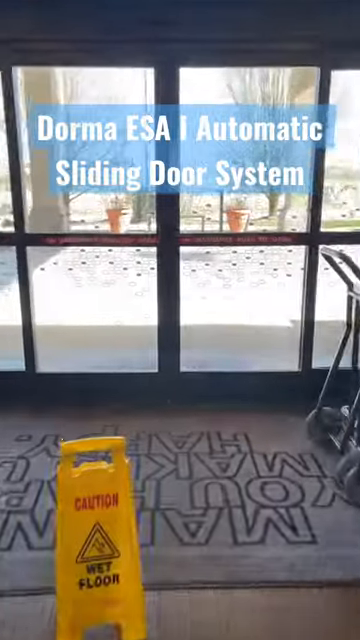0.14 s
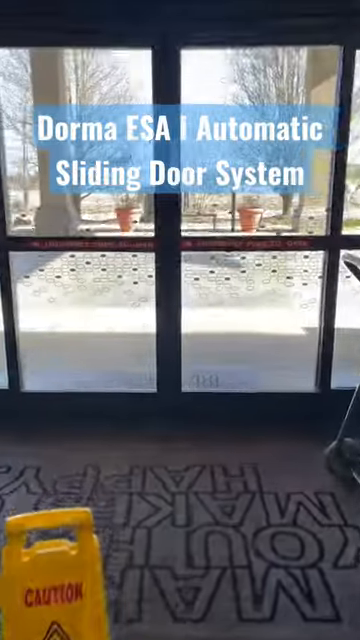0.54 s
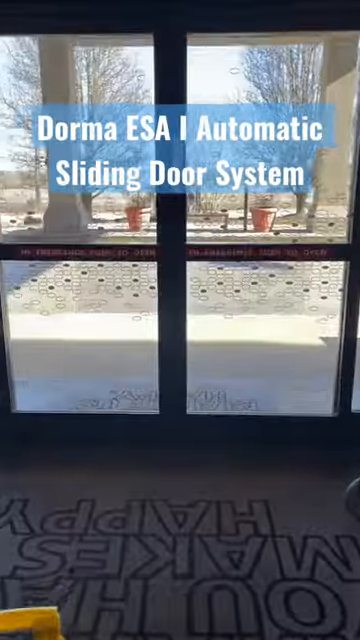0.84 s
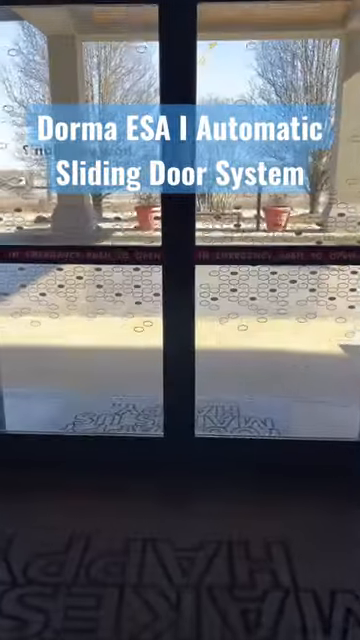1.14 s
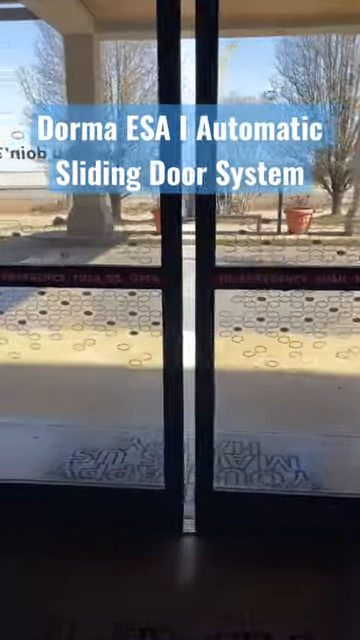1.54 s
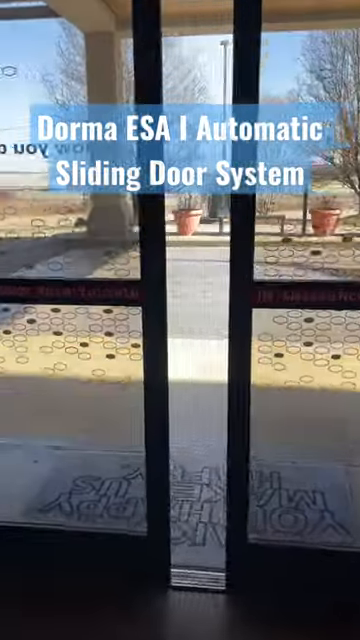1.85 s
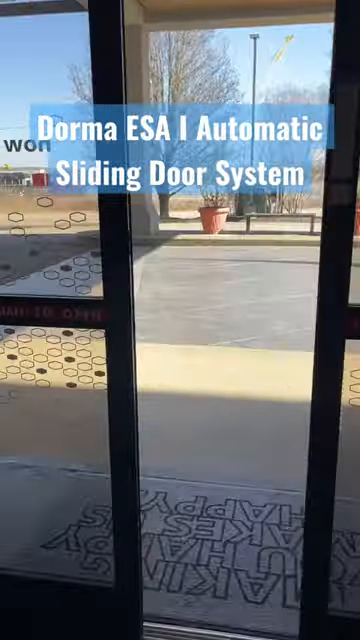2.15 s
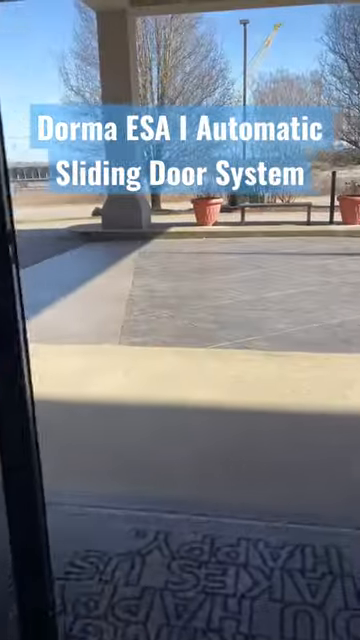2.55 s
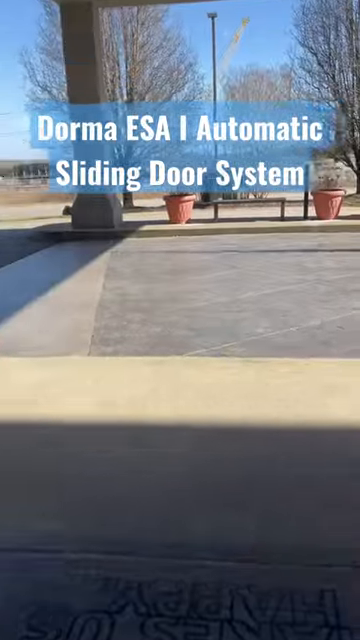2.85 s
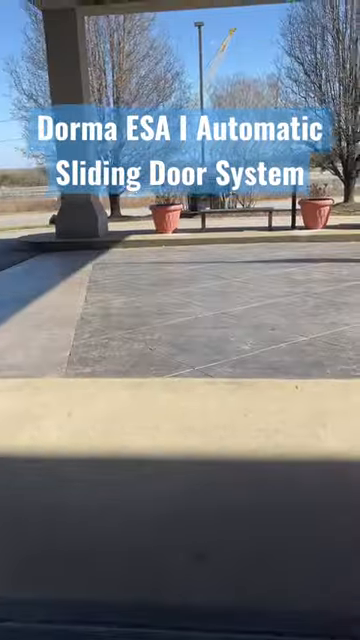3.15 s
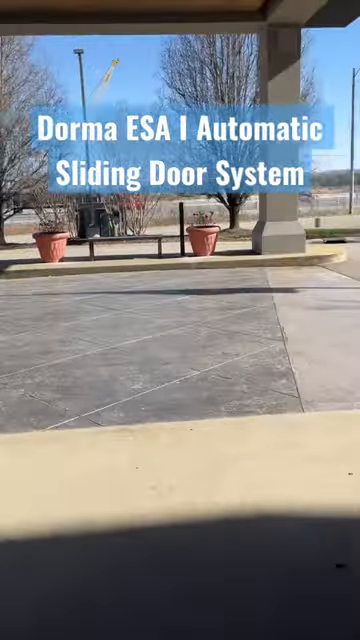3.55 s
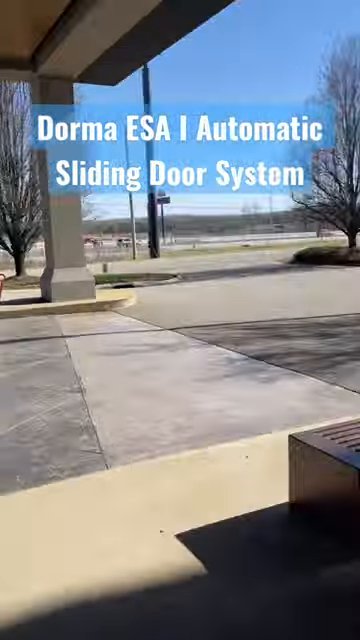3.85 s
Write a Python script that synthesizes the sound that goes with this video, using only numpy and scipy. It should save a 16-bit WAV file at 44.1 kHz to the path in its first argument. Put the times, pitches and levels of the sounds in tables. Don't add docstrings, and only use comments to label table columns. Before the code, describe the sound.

Automatic glass sliding doors part with soft brush hiss as low street roar swells in

```python
import sys
import numpy as np
from scipy import signal
from scipy.fft import rfft, irfft, next_fast_len
from scipy.io import wavfile
from scipy.ndimage import uniform_filter1d

SR = 44100
rng = np.random.default_rng(int(sys.argv[2]) if len(sys.argv) > 2 else 0)


def how_loud(loudness_db):
    steps = np.asarray(loudness_db, float) / 20
    return 10 ** steps


def store_pcm(level_fs):
    pcm = np.round(np.clip(level_fs, -1, 1) * 32767).astype(np.int16)
    wavfile.write(sys.argv[1], SR, np.atleast_2d(pcm).T)


N = 176400
BIG_KEY_HZ = 11058


def evened(x):
    return x / np.sqrt(np.mean(x ** 2) + 1e-20)


def read(points, hz):
    f, value = np.transpose(points)
    return np.interp(np.log(hz + 1), np.log(f + 1), value)


def drift(rate, size=N):
    t = np.arange(0, size + 64, 64) / SR
    slow = 0
    for f in np.geomspace(rate / 20, rate, 20):
        slow = slow + np.sin(2 * np.pi * (f * t + rng.random())) / np.sqrt(f)
    return np.interp(np.arange(size) / SR, t, evened(slow))


def resonate(x, hz, width):
    turn = np.exp(2j * np.pi * hz * np.arange(x.shape[-1]) / SR)
    r = np.exp(-np.pi * width / SR)
    return 2 * (turn * signal.lfilter([1 - r], [1, -r], x / turn)).real


def narrowband(noise, hz, width, second_width=None):
    once = resonate(noise, hz, width)
    return evened(resonate(once, hz, second_width or width))


def wash(spectrum, patchy_db):
    frames, hz = N // 512 + 6, np.fft.rfftfreq(2048, 1 / SR)
    a, b, c, d, patches = rng.standard_normal((frames, 1025, 5)).T
    patches = uniform_filter1d(patches, size=20, axis=0)
    patches = evened(uniform_filter1d(patches, size=8, axis=1))
    inside = (hz > spectrum[0][0] / 2)[:, None]
    gain = how_loud(read(spectrum, hz)[:, None] + patchy_db * patches) * inside
    z = np.array([a + 1j * b, c + 1j * d]) * gain
    return evened(signal.istft(z, nperseg=2048, noverlap=1536)[1][:, :N])


def add(mix, s, sound):
    part = mix[:, round(s * SR):][:, :sound.shape[1]]
    part += sound[:, :part.shape[1]]


# (start [s], end [s])
WHISTLE_ON = [(.27, .41), (.55, 1.06), (1.08, 1.56), (1.58, 1.66), (1.72, 1.79), (2.04, 2.22), (2.29, 2.33),
              (2.59, 2.68), (2.97, 3.1), (3.31, 3.35), (3.4, 3.65), (3.72, 3.9)]


def whistle():
    hz, level_db = 15695, -88
    t = np.arange(N) / SR
    on = sum(np.clip(np.minimum(t - a, b - t) / .015, 0, 1) for a, b in WHISTLE_ON)
    return how_loud(level_db) * on * narrowband(rng.standard_normal(N), hz, 60)


# (frequency [Hz], level per Hz [dB])
LOBBY = [(15, -33), (25, 8), (76, -9), (149, -11.5), (236, -16), (619, -32), (828, -24.5), (1880, -32),
         (2050, -39.5), (8000, -72), (10400, -95), (17600, -120)]


def lobby():
    return how_loud(-44 + .3 * drift(6.8)) * wash(LOBBY, patchy_db=2.0)


# (frequency [Hz], level per Hz [dB])
AIR = [(3000, -1.5), (6500, -4), (8200, -2.5), (9300, -4), (10600, -0.5), (11400, -8), (12000, -17),
       (13000, -48)]
# (time [s], level [dB])
HISS = [(0, -18), (.8, -6.5), (1.35, -3.5), (1.85, -1.5), (2.3, 2.5), (2.7, 2), (3.2, -1.5), (3.64, -2.5),
        (4, -8)]


def air():
    hiss_db = np.interp(np.arange(N) / SR, *np.transpose(HISS))
    return how_loud(-61.5 + hiss_db + 0.28 * drift(5.34)) * wash(AIR, patchy_db=-2.5)


# (frequency [Hz], level per Hz [dB])
SLEEVE = [(1500, -6), (4000, -6.5), (6500, -8.5), (8500, 2), (9600, 3.5), (11200, 3.5), (12600, -2),
          (13300, -38)]


def sleeve():
    hold_s, fade_db_per_s = 0.14, 44.5
    fade_db = fade_db_per_s * np.maximum(np.arange(N) / SR - hold_s, 0)
    return how_loud(-47 - fade_db + .8 * drift(40)) * wash(SLEEVE, patchy_db=1.5)


def roller_whine():
    start_s, end_s, hz, level_db = 1.25, 1.47, 4480, -76
    t = np.arange(N) / SR
    rolling = np.clip(np.minimum(t - start_s, end_s - t) / 0.01, 0, 1)
    return how_loud(level_db) * rolling * evened(resonate(rng.standard_normal((2, N)), hz, 90))


# (time [s], street [dB], engine first order [dB], engine second order [dB], porch boom [dB])
OUTSIDE = [(0, -18, -38.5, -40, -17.5), (.25, -15, -37.5, -47, -9.5), (.5, -20, -35, -45.5, -17),
           (.85, -21, -36, -44.5, -12.5), (1.27, -17, -42, -53.5, -17.5), (1.43, -14, -42.5, -35.5, -14.5),
           (1.62, -9.5, -37, -39, -10), (1.9, -7, -55, -35.5, -4.5), (2.3, -3.5, -54, -34.5, -4.5),
           (2.65, -2.5, -43, -30, -5.5), (2.82, -3, -35, -39, -1), (3.0, -3.5, -34, -27.5, -1),
           (3.2, -1, -31, -36, -2.5), (3.349, -3, -33, -26.5, -4.5), (3.5, -3, -28, -32.5, -2),
           (3.65, -0.5, -20.5, -28.5, 5.5), (3.87, 1, -29.5, -42, 2.5), (4, 2, -30.5, -28.5, -10.5)]


def outside(column):
    rows = np.array(OUTSIDE)
    return np.interp(np.arange(N) / SR, rows[:, 0], rows[:, column])


# (frequency [Hz], level per Hz [dB])
STREET = [(15, -46), (25, -10), (69, -2), (181, -3.5), (230, -4.5), (523, -14.5), (1130, -23), (1880, -31),
          (2050, -31.5), (3400, -42.5), (8000, -66.5), (10400, -96), (17600, -120)]


def street():
    return how_loud(-25.5 + outside(column=1) + .7 * drift(6)) * wash(STREET, patchy_db=1.8)


# (frequency [Hz], width [Hz], level [dB])
BOOMS = [(114.6, 18, -35.5), (179.5, 27.6, -40.5), (208.1, 14, -37), (237.3, 21, -36.5),
         (330.7, 13.2, -44.5), (777, 174, -42.5), (1750, 180, -54)]


def porch():
    low_db, high_db = outside(column=4), outside(column=1)
    total = 0
    for hz, width, db in BOOMS:
        opening_db = low_db if hz < 300 else high_db
        boom = narrowband(rng.standard_normal((2, N)), hz, width * 1.48)
        total = total + how_loud(db + opening_db + drift(4.5)) * boom
    return total


def engine():
    idle_hz, waver_hz, fuzz_width_hz, fuzz_share = 65.76, 0.791, 8.9, 0.51
    turns = np.cumsum(idle_hz + waver_hz * drift(2.99)) / SR
    out = 0
    for order in (1, 2):
        fuzz = narrowband(rng.standard_normal(N), order * idle_hz, fuzz_width_hz * order)
        line = np.sin(2 * np.pi * order * turns)
        out = out + how_loud(outside(column=order + 1)) * evened(line + fuzz_share * fuzz)
    return np.array([out, 0 * out])


def car():
    closest_s, half_width_s, tyre_hz, level_db = 3.42, 0.18, 800, -35
    near = 1 / (1 + ((np.arange(N) / SR - closest_s) / half_width_s) ** 2)
    return how_loud(level_db) * near * narrowband(rng.standard_normal((2, N)), tyre_hz, 490, 400)


# (time [s], level [dB], frequency [Hz])
THUDS = [(.0, -43, 486), (.116, -36.5, 754), (.13, -40, 520), (0.172, -38, 297), (0.302, -38, 200),
         (0.371, -35.5, 233), (0.679, -35.5, 198), (1.03, -51, 1300), (1.2, -44, 410), (1.66, -38.5, 680),
         (1.76, -38, 480), (2.227, -30, 547), (3.692, -39, 700)]


def thud(s, db, hz):
    t, t60 = np.arange(SR // 4) / SR, .14
    body = narrowband(rng.standard_normal((2, len(t))), hz, hz * .35)
    return s, np.minimum(t / .01, 1) * how_loud(db - 60 * t / t60) * body


# (time [s], level [dB], centre [Hz], T60 [s], rise [s])
SCUFFS = [(0.184, -50.5, 1980, 0.14, .006), (0.294, -51.5, 2170, 0.2, 0.0032), (0.296, -61, 5200, .1, .003),
          (0.351, -52, 2080, .08, .003), (.352, -64, 4600, .05, .002), (.402, -63, 4400, .08, .004),
          (0.894, -49, 9000, 0.25, .003), (0.894, -54, 7900, .1, .003), (0.893, -58, 5050, 0.26, 0.0027),
          (.896, -61, 6800, .2, .004), (.896, -60, 11700, 0.12, .003), (.897, -55, 2000, 0.19, 0.0045),
          (.96, -64.5, 4800, .3, 0.032), (1.02, -53, 2130, 0.26, 0.015), (1.045, -62, 3660, 0.24, .006),
          (1.118, -54, 8000, 0.011, 0.00086), (1.118, -57, 5450, .012, .001),
          (1.129, -57, 8100, .015, 0.00092), (1.194, -61, 8800, 0.054, .003), (1.195, -64, 5040, .08, .004),
          (1.207, -55, 7600, 0.18, 0.0022), (1.213, -59.5, 3600, 0.31, .006),
          (1.211, -61, 6000, .15, 0.0037), (2.17, -61, 3500, 0.14, .004), (2.421, -61, 5550, .15, .004),
          (2.658, -53, 3020, 0.091, .004), (2.69, -49, 3840, 0.14, .004), (2.7, -49, 2570, 0.56, 0.018),
          (2.77, -55, 4600, .06, .003), (2.841, -52, 3740, 0.16, .004), (2.933, -56, 4500, 0.018, .001),
          (2.94, -60, 2580, .5, 0.018), (3.075, -65, 5900, .12, .004), (3.571, -50.5, 3000, 0.12, 0.0068),
          (3.575, -73, 8600, .1, .005), (3.849, -57.5, 3500, 0.21, 0.011), (3.956, -52, 2800, 0.16, 0.0072),
          (3.96, -67, 8200, .1, .006)]


def scuff(s, db, hz, t60, rise):
    spread, wide_db = .08, -7
    t = np.arange(SR // 4) / SR
    noise = rng.standard_normal((2, len(t)))
    band = narrowband(noise, hz, 400 + hz * spread, 1200 + hz * spread * 2)
    wide = evened(signal.lfilter(*signal.butter(3, [1500, 9800], "bandpass", fs=SR), noise))
    envelope = np.minimum(t / rise, 1) * how_loud(db - 60 * np.maximum(t - rise, 0) / t60)
    return s, envelope * (band + how_loud(wide_db) * wide)


def singing():
    start_s, end_s, level_db = 2.851, 2.906, -48
    t = np.arange(SR // 5) / SR
    after = t - end_s + start_s
    fall_db = -14 * np.clip(after / .004, 0, 1) - 250 * np.maximum(after, 0)
    level = how_loud(level_db + fall_db + 1.5 * drift(80, size=len(t)))
    tone = np.minimum(t / .006, 1) * level * np.sin(2 * np.pi * BIG_KEY_HZ * t)
    return start_s, np.array([tone, tone])


# (frequency [Hz], level [dB], T60 [s])
KEYS = [(4200, -10, .035), (5165, -11, .05), (6400, -12, .04), (7040, -11, .05), (7600, -9, .04),
        (8300, -9, .06), (8760, -10, .04), (9100, -9, .05), (10800, -9, .04), (11500, -10, .04),
        (11900, -12, .04)]
# (time [s], length [s], level [dB], big key level [dB], snap of the first clink [ratio])
JINGLES = [
    (0.4553, 0.0049, -52.5, -42, 0.76),
    (0.48, 0.012, -66, -65, .6),
    (0.502, 0.029, -59.5, -57, 1),
    (2.69, 0.033, -56, -70, 1.1),
    (2.739, 0.047, -54.5, -60, .15),
    (2.799, .025, -62, -66, .1),
    (2.83, 0.03, -55.5, -70, .3),
    (2.84, 0.056, -53.5, -42.5, .3),
    (3.08, 0.024, -62.5, -58, .3),
    (3.215, 0.032, -67, -77, .4),
]


def jingle(s, length, db, big_db, snap):
    clinks_per_s, scrape_db, scrape_t60 = 500, 13, .2
    t = np.arange(SR // 4) / SR
    pick_db = rng.uniform(-6, 3, len(KEYS))
    modes = [(hz, level + db + p, t60) for (hz, level, t60), p in zip(KEYS, pick_db)]
    modes.append((BIG_KEY_HZ, big_db, .07))
    shape = (len(modes), len(t))
    hits = (t < length) * (rng.random(shape) < clinks_per_s / SR) * rng.normal(0, 0.57, shape)
    hits[:, 0] = 1
    ring = 0
    for hit, (hz, level, t60) in zip(hits, modes):
        mode = how_loud(level - 60 * t / t60) * np.sin(2 * np.pi * hz * t)
        ring = ring + signal.oaconvolve(hit, mode)[:len(t)]
    metal_band = signal.butter(4, [2000, 11500], "bandpass", fs=SR, output="sos")
    noise = signal.sosfilt(metal_band, rng.standard_normal((2, len(t))))
    scrape = how_loud(db + scrape_db - 60 * np.maximum(t - length, 0) / scrape_t60)
    scrape = scrape * (.5 + snap * np.exp(-t / 0.0023))
    return s, ring + scrape * noise


# (frequency [Hz], likeness [ratio])
SAME = [(150, .997), (300, .96), (450, .82), (700, .6), (1050, .35), (1500, .65), (2200, .4), (4500, .5),
        (7000, .5)]
# (frequency [Hz], lead [rad])
LEAD = [(450, -1.12), (700, -1), (950, -1.88), (1100, 0.03), (1750, 0.9), (2050, -2.5), (3500, 0.5),
        (7600, -1.23)]
# (frequency [Hz], level [dB])
TILT = [(300, .3), (450, -.3), (950, 4.5), (1800, 0), (2400, 4.5), (4000, 2.5), (5200, 5), (6500, 2.5),
        (8300, .2)]


def ports(pair):
    alike_from_hz, alike_to_hz, turn_from_hz, turn_to_hz = 7200, 8500, 8550, 11850
    size = next_fast_len(N + 4096)
    hz, (a, b) = np.fft.rfftfreq(size, 1 / SR), rfft(pair, size)
    same = np.clip(read(SAME, hz), 0, 1)
    same = same + (1 - same) * np.clip((hz - alike_from_hz) / (alike_to_hz - alike_from_hz), 0, 1)
    sweep = np.clip((hz - turn_from_hz) / (turn_to_hz - turn_from_hz), 0, 1)
    lead = read(LEAD, hz) * np.clip(hz / 450, 0, 1) ** 2 * np.clip((turn_from_hz - hz) / 900, 0, 1)
    lead = lead + 2 * np.pi * sweep
    right = (same * a + np.sqrt(1 - same ** 2) * b) * np.exp(1j * lead)
    tilt = how_loud(read(TILT, hz) / 2)
    return irfft(np.array([a * tilt, right / tilt]), size)[:, :N]


def scene():
    near = lobby() + air() + sleeve() + roller_whine()
    near = near + street() + porch() + engine() + car()
    add(near, *singing())
    for make, rows in ((thud, THUDS), (scuff, SCUFFS), (jingle, JINGLES)):
        for row in rows:
            add(near, *make(*row))
    return ports(near)


def gate(x):
    gate_db, follow, from_hz, sparse = -117, .22, 5500, 0.048
    mid_side = np.array([x[0] + x[1], x[0] - x[1]]) / 2
    hz, _, z = signal.stft(mid_side, SR, "cosine", 2048, scaling="psd", boundary="even")
    power = (abs(z[:, :1024]) ** 2).reshape(2, 64, 16, -1)
    bands_db = 10 * np.log10(power.mean(2) + 1e-20)
    loud_db = 10 * np.log10((abs(z[0]) ** 2).sum(0) * 2 * hz[1] + 1e-20)
    threshold_db = gate_db + follow * (loud_db + 30) + 1.5 * rng.standard_normal(bands_db.shape)
    keep = np.repeat(bands_db > threshold_db, 16, axis=1) | (hz[:1024, None] < from_hz)
    keep = np.pad(keep, ((0, 0), (0, 1), (0, 0)))
    around = abs(uniform_filter1d(abs(z), size=16, axis=1)) + 1e-9
    peaky = (abs(z) / around) ** (2 * sparse)
    mid, side = signal.istft(z * peaky * keep, SR, "cosine", 2048, scaling="psd")[1][:, :N]
    return np.array([mid + side, mid - side])


def top_cut(x):
    return signal.sosfilt(signal.butter(12, 15770, fs=SR, output="sos"), x)


def record(dry):
    cut = signal.sosfiltfilt(signal.butter(14, 12150, fs=SR, output="sos"), dry)
    cut = signal.sosfilt(signal.butter(2, 50.4, "highpass", fs=SR, output="sos"), cut)
    cut = cut * np.minimum((N - np.arange(N)) / 120, 1)
    return top_cut(gate(cut) + whistle())


dry = scene()
out = record(dry)
store_pcm(out)
```